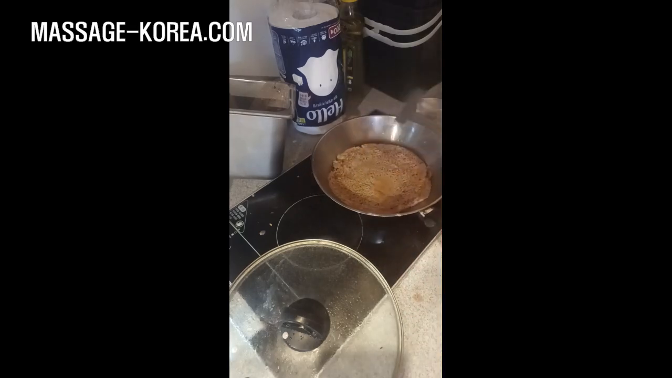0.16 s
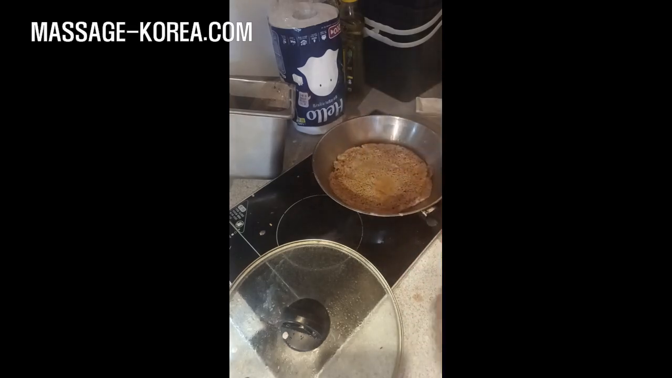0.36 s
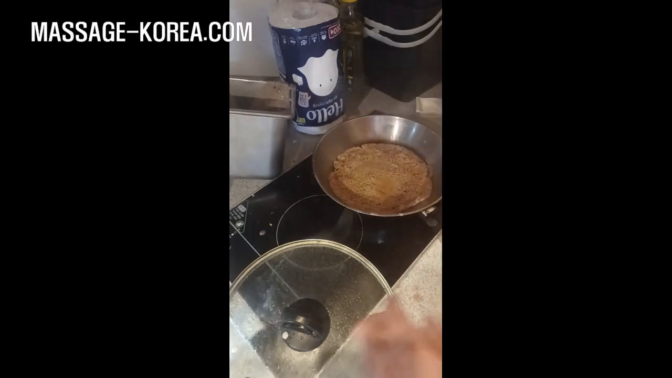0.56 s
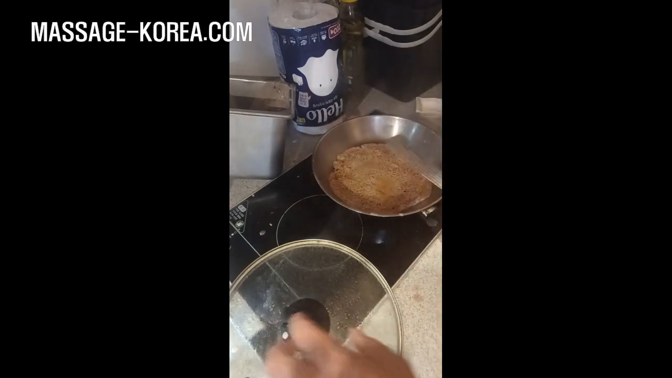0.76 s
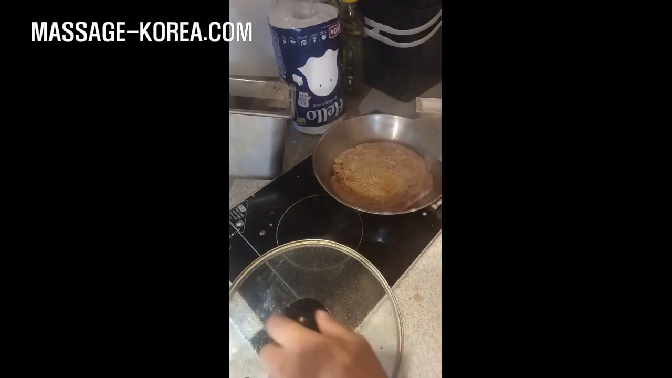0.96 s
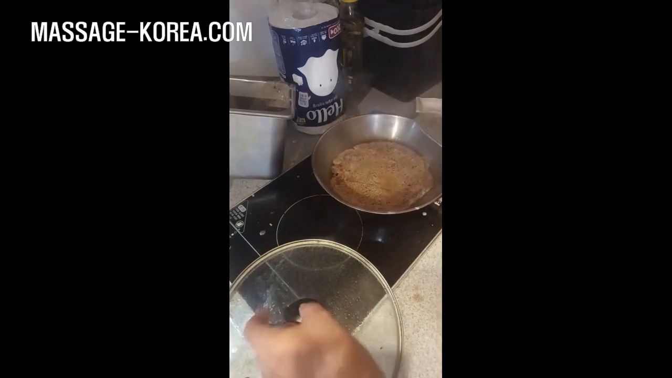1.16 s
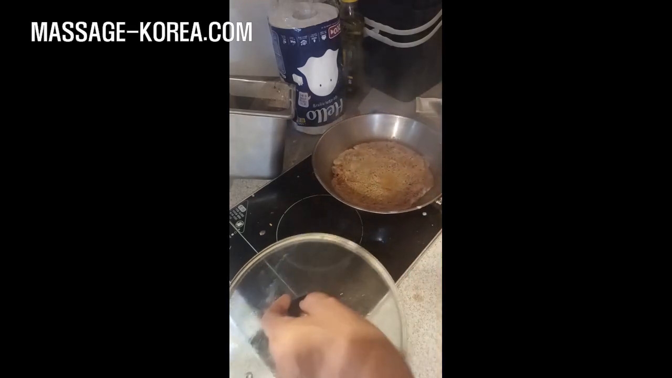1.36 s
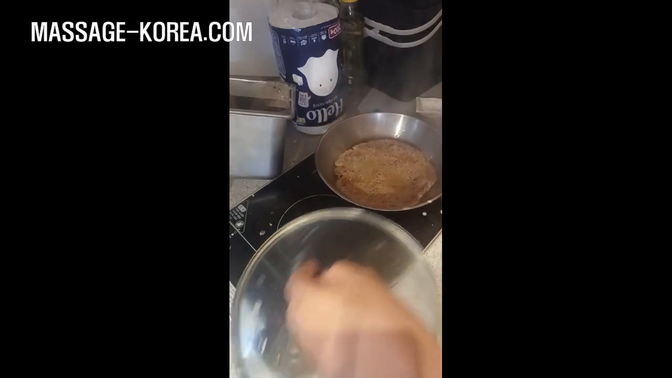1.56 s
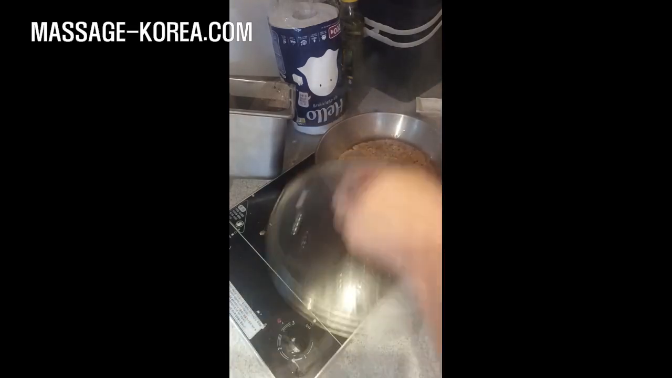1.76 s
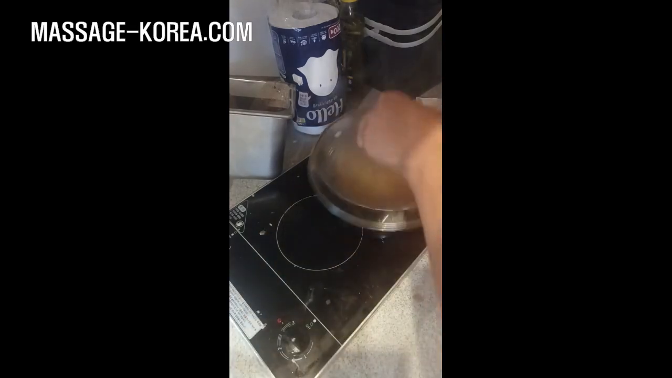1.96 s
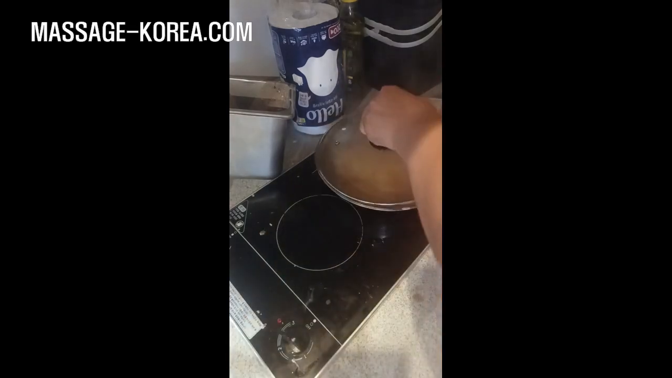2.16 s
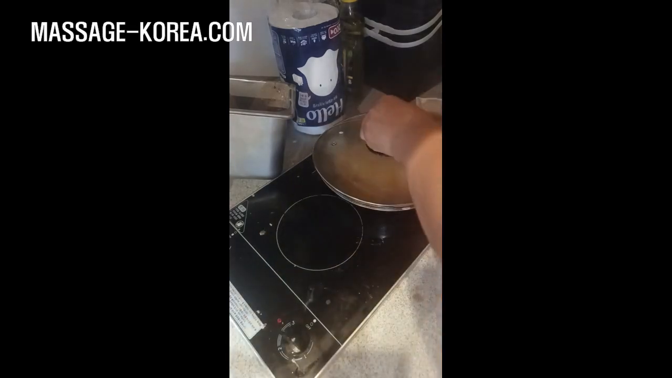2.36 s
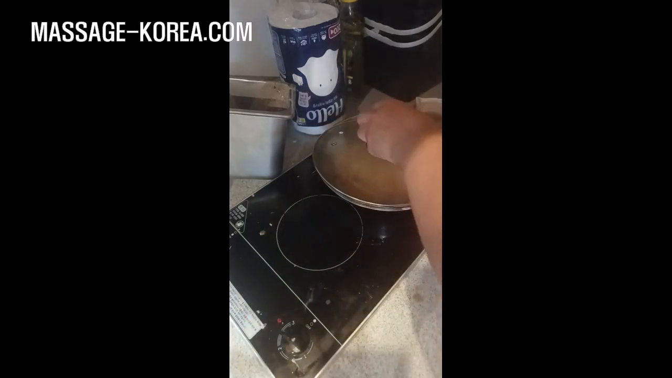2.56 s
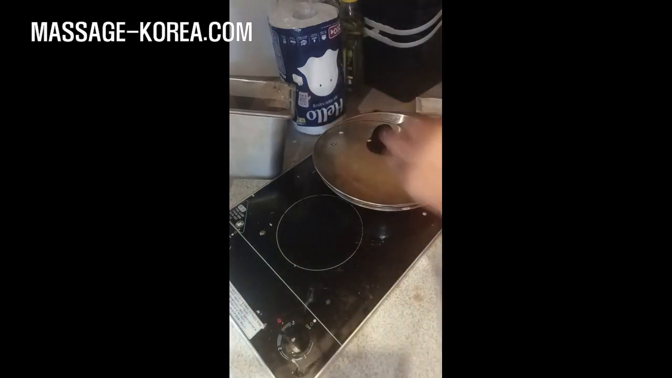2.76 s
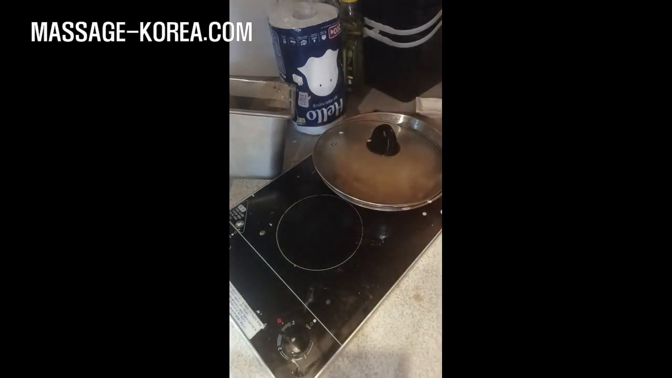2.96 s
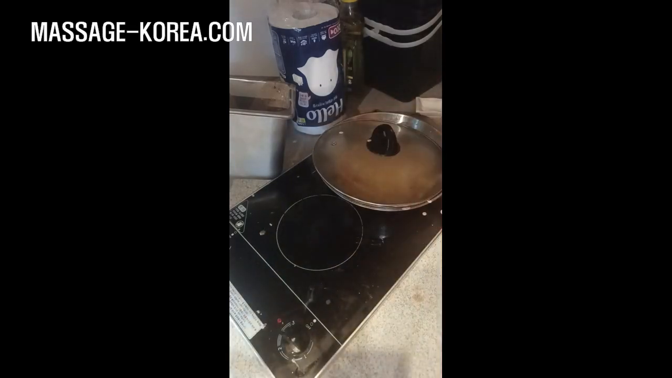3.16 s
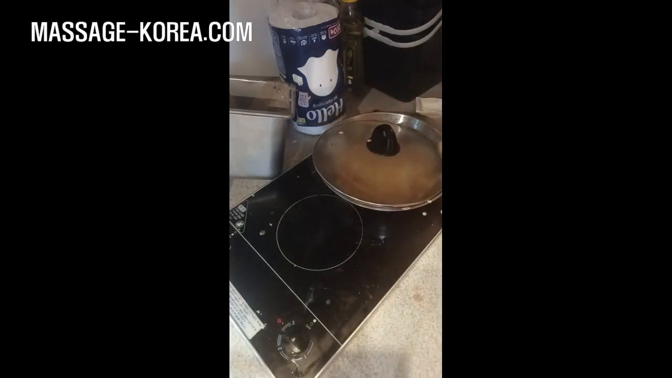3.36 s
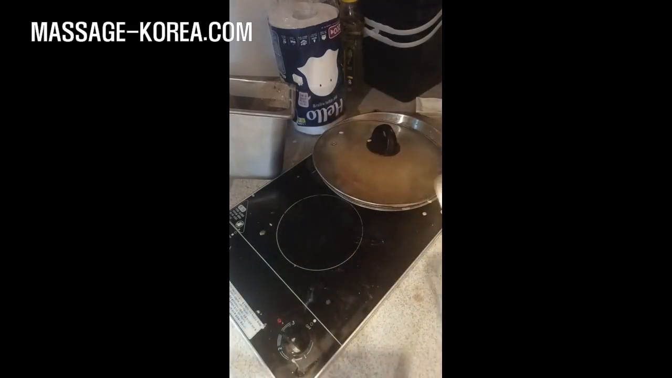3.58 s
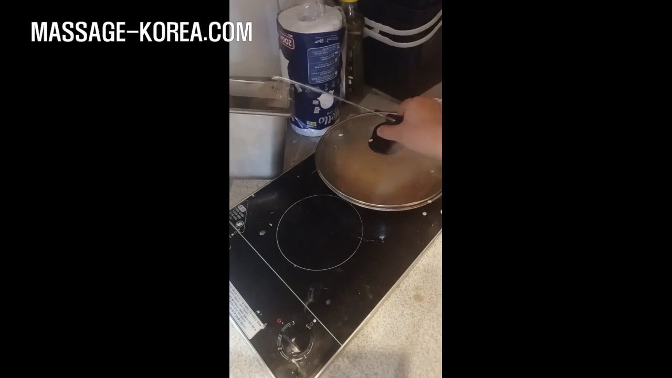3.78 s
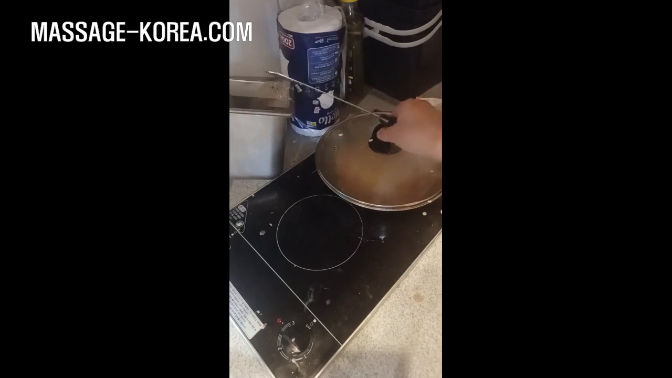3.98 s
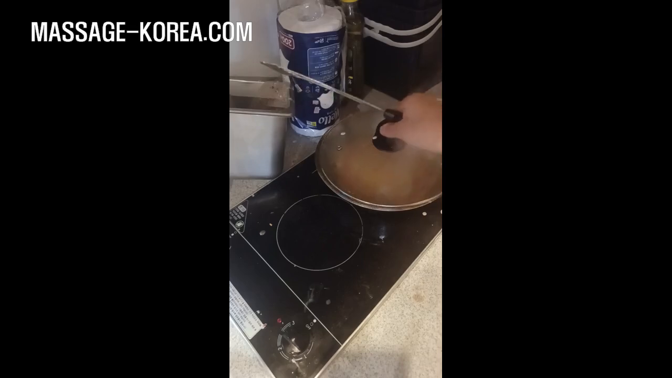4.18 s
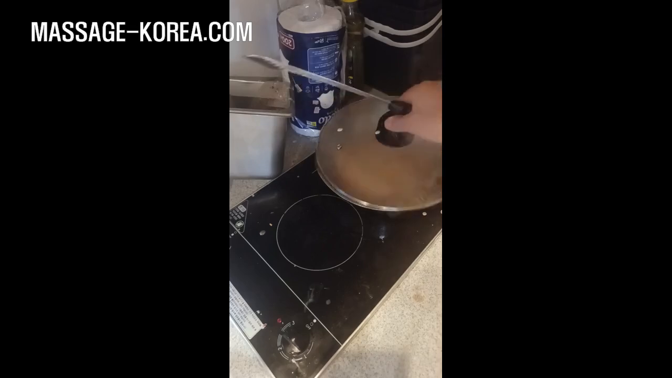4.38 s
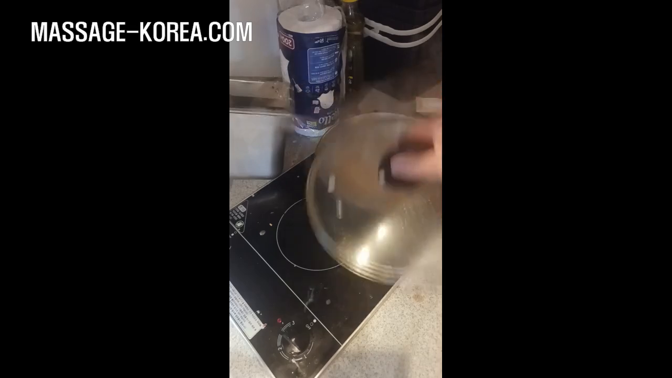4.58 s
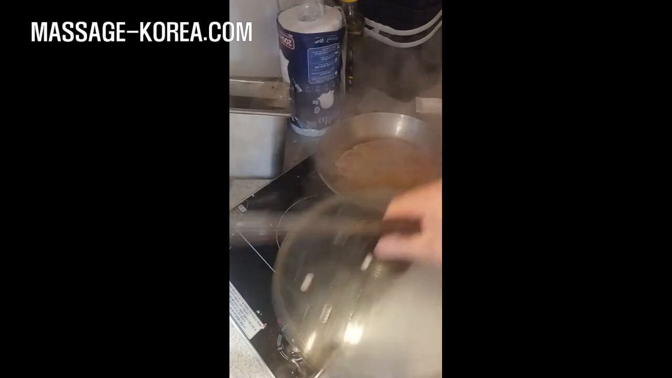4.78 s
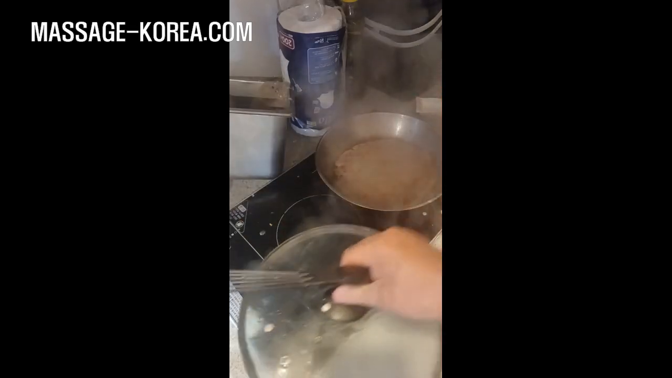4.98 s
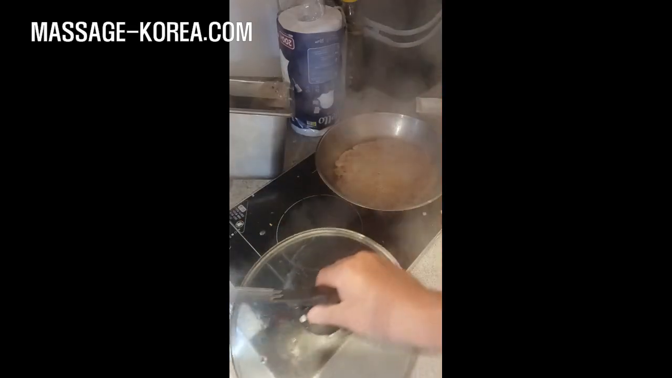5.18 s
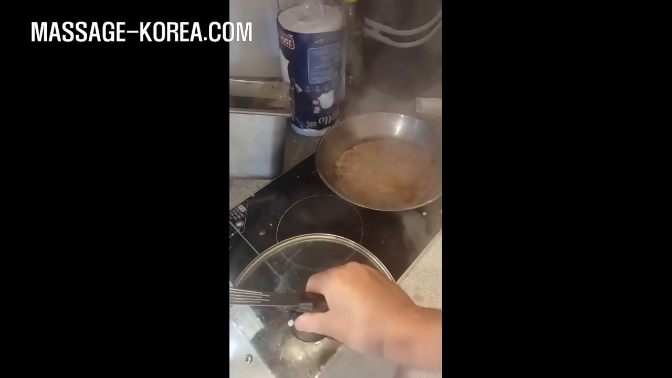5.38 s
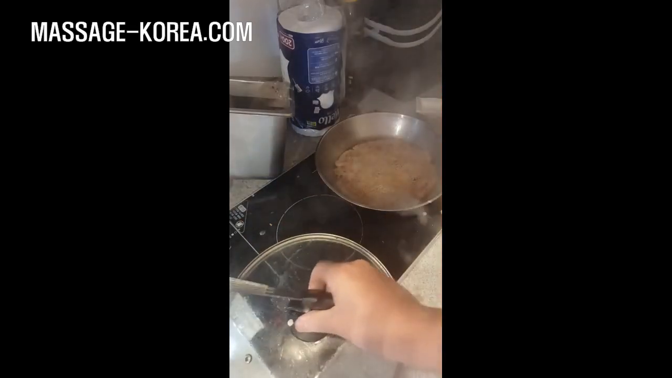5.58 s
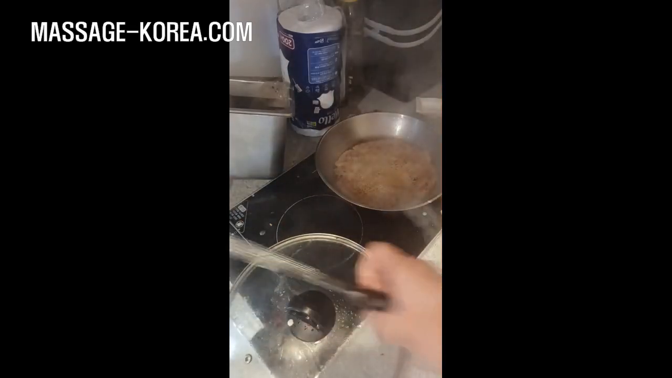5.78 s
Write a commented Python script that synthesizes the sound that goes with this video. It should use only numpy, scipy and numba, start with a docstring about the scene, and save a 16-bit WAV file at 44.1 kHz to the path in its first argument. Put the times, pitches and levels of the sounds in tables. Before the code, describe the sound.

Phone-close frying in a small hard kitchen over faint hob hum and fan rumble. Bubbles tick and oil spits; soft handling knocks precede a clattering low thump as the lid covers the pan. The sizzle turns muffled and resonant. An abrupt cut leads to rattling glass, violent steamy spitting as the lid lifts, then several hard knocks on the hob, bright steel clinks and a calmer sizzle.

```python
"""Pancake under a glass lid

A pancake sizzles in oil in a steel pan, close to a phone: bubble clicks, snaps and noisy spits of oil.
A glass lid (ringing modes) is picked up and thumped on, which muffles the frying and makes it hollow.
After a cut with a split second of silence, the pan is full of steam: the lid rattles and comes off a louder,
wetter sizzle. It is put down on the hob, where a steel utensil clinks on it, over hum and fan in a small kitchen."""
import sys
import numpy as np
from scipy import signal
from scipy.fft import rfft, irfft, next_fast_len
from scipy.io import wavfile
from numba import njit

SR = 44100
rng = np.random.default_rng(int(sys.argv[2]) if len(sys.argv) > 2 else 0)


def master(y):
    """Save y as 16-bit WAV."""
    cut = np.clip(np.atleast_2d(y).T, -1, 1)
    pcm = np.round(cut * 32767)  # scale
    wavfile.write(sys.argv[1], SR, pcm.astype(np.int16))


N = 257103
TIME = np.arange(N) / SR
SIZE = next_fast_len(N + 8192, real=True)  # padded length for filtering by spectrum
FREQ = np.arange(SIZE // 2 + 1) * SR / SIZE
TOP_HZ = 15600  # top of the phone's band


# how far the lid closes the pan: lowered, seated, tilted, lifted off (t/s, closed share/0-1)
LID_CLOSED = [(1.7, 0.02), (2.02, 0.44), (2.2, 0.57), (2.42, 0.99), (4.08, 0.94), (4.33, 0.53),
              (4.41, 0.07)]
# how hard the oil fries: settles, boils up with trapped steam, dries off (t/s, relative level/dB)
HEAT = [(0, -10.5), (.2, -15), (.4, -16.5), (.92, -15), (1.55, -16), (1.95, -18.5), (2.7, -22),
        (3.7, -22.5), (3.74, -11), (3.88, -10.5), (4.0, -14), (4.13, -6.5), (4.6, -8), (4.75, -8.5),
        (5.38, -8.5), (5.53, -15)]
MUFFLE_DB = -8.5  # what a closed lid takes off the sizzle at its source


def frying(bed_db, crackle_db, left_db, hollow_db, rattle_db, clack_db, clack_hz):
    """The sizzle leaves the open pan directly, or else by the rim gap and the ringing air under the lid."""
    closed = np.clip(curve(LID_CLOSED), 0, 1)
    strength = undb(curve(HEAT) + MUFFLE_DB * closed)
    bed = bubbles(per_s=2400, spread_db=5.5, flurry_per_s=190, flurry_db=3.7, flurry_t60=.034, fizz=.9)
    source = bed * strength * undb(bed_db)
    source += spits(gain_db=-2.5, body_db=-1.5, snap=0.54, body_hz=3150)
    snaps = undb(crackle_db) * strength * crackles(per_s=600, spread_db=4.2, t60=.0013, low_hz=2000)
    oil = ports(scatter(source, t60=0.081, direct=0.84) + snaps, split_hz=1420, lag_s=0.0001154)

    # the rim's taps are heard directly and through the air under the lid
    taps = rim_taps(rattle_db, clack_hz)
    clacks = undb(clack_db) * ports(np.array([taps, np.roll(taps, 40)]), split_hz=1500)
    under_lid = ports(scatter(source, t60=0.037, direct=1.3) + taps, split_hz=1800)
    hollow = undb(hollow_db) * cavity(under_lid, closed, gap_hz=233)
    both = pan_colour(oil, hollow, closed) + clacks
    return both * undb([[left_db / 2], [-left_db / 2]])


def bubbles(per_s, spread_db, flurry_per_s, flurry_db, flurry_t60, fizz):
    """Tiny steam bubbles burst as clicks at chance moments; fading flurries swell them over a steady fizz."""
    flurry_size = undb(flurry_db * np.minimum(rng.standard_normal(N), 2))
    starts = (rng.random(N) < flurry_per_s / SR) * flurry_size
    power = np.abs(signal.fftconvolve(starts ** 2, fade(TIME[:SR // 4], flurry_t60) ** 2)[:N])
    click_size = undb(spread_db * np.minimum(rng.standard_normal(N), 2))
    clicks = (rng.random(N) < per_s / SR) * rng.choice([-1, 1], N) * click_size
    return clicks / clicks.std() * np.sqrt((power / power.mean() + fizz) / (1 + fizz))


def crackles(per_s, spread_db, t60, low_hz):
    """Lone bubbles snap as tiny decaying tones, each at its own pitch and with its own phase at each port."""
    out, t = np.zeros((2, N)), TIME[:100]
    for when, pitch, size, *phases in rng.random((int(per_s * N / SR), 5)):
        hz = low_hz + pitch * (TOP_HZ - low_hz)
        db = spread_db * min(-np.log(1 - size), 4)
        ring = np.sin(2 * np.pi * (hz * t + np.array(phases)[:, None])) * fade(t, t60)
        add(out, when * N / SR, undb(db) * ring)
    return out / out.std()


# single spits of oil at set times, faint to loud (t/s, relative spray level/dB, t60/s, relative body level/dB)
SET_SPITS = [(.079, -3.5, .044, -11), (0.481, -10, .06, -12), (.5564, -8.5, 0.055, -6),
             (0.7551, -4, .045, -16), (0.9131, -9, 0.11, -5), (0.9856, -2, .07, -19),
             (1.1128, -2, 0.061, -15), (1.1606, -9, 0.059, -28), (1.3395, 0, 0.027, -20),
             (1.376, -4, .056, -3), (1.5197, -12, .065, -28), (1.721, -5.5, 0.044, -28),
             (1.953, -18, .06, -6.5), (2.0157, -13, 0.17, -10), (2.278, -10, 0.26, -9),
             (2.5352, -13.5, 0.078, -23), (2.842, -9.5, 0.035, -31), (2.8964, -13, .13, -31),
             (3.072, -14, 0.084, -19), (3.2434, -5.5, 0.028, -30), (3.475, -16.5, 0.096, -11.5),
             (3.7308, -7, 0.15, -7.5), (4.2284, 10.5, 0.023, 3), (4.4381, 3, .07, 1),
             (4.725, 10.5, 0.043, -2), (4.839, -11, .049, 11.5), (5.019, -6, 0.039, 6),
             (5.187, 9, 0.034, -14), (5.6037, 0.5, 0.037, -15), (5.77, 1.5, .049, 0)]


def spits(gain_db, body_db, snap, body_hz):
    """A drop of water explodes: a snap and a fading high spray, over a lower body with its own level."""
    out, t = np.zeros(N), TIME[:SR // 6]
    low = signal.butter(2, body_hz, fs=SR, output="sos")
    high = signal.butter(2, body_hz, "high", fs=SR, output="sos")
    for s, db, t60, low_db in SET_SPITS + small_spits():
        envelope = fade(t, t60) + snap * fade(t, 0.0043)
        spray, body = rng.standard_normal((2, len(t))) * envelope
        add(out, s, undb(db + gain_db) * signal.sosfilt(high, spray))
        add(out, s, undb(low_db + body_db) * signal.sosfilt(low, body))
    return out


# the many small spits come by chance; spray and body levels are relative to the heat
SMALL_SPITS_PER_S = 15
SMALL_SPIT_DB, SMALL_BODY_DB, SMALL_SPREAD_DB, SMALL_T60_S = 3, 1.5, 4.5, 0.064


def small_spits():
    """Chance rows like those of SET_SPITS, loosely spaced and as strong as the oil is hot."""
    rows = []
    for k, (late, size, body) in enumerate(rng.random((int(SMALL_SPITS_PER_S * N / SR), 3))):
        s = (k + late) / SMALL_SPITS_PER_S
        heat = np.interp(s, *np.transpose(HEAT))
        spray_db = heat + SMALL_SPIT_DB + SMALL_SPREAD_DB * (2 * size - 1)
        low_db = heat + SMALL_BODY_DB + 2 * SMALL_SPREAD_DB * (2 * body - 1)
        rows.append((s, spray_db, SMALL_T60_S, low_db))
    return rows


def scatter(x, t60, direct):
    """Each click comes from its own spot in the pan, so each gets a different short tail of reflections."""
    decay = fade(TIME[:SR // 6], t60) ** 2
    power = np.abs(signal.fftconvolve(x ** 2, decay / decay.sum())[:N])
    paths = np.array([x, x * rng.choice([-1, 1], N)])
    tail = np.sqrt(power) * rng.standard_normal((2, N))
    return (direct * paths + tail) / np.sqrt(1 + direct ** 2)


# the short silence at a cut to a later, steamy moment (start t/s, end t/s)
CUT_S = (3.7155, 3.7302)
# colour of the open pan, before and after steaming (f/Hz, relative level/dB)
OIL_COLOUR = [(150, -23), (300, -50.5), (550, -11.5), (830, 7), (1050, 1.5), (1500, 6), (2500, 5.5),
              (4200, 2.5), (5600, 1.5), (7100, 5), (8300, -0.5), (11000, 3), (15500, -0.5)]
WET_COLOUR = [(150, -34), (550, -37), (800, 1), (1100, -1), (1450, -0.5), (1850, 7.5), (2300, 2.5),
              (2700, 5), (4700, 3.5), (7100, 6.5), (8000, 2.5), (9000, 0), (11000, 1), (15500, 0.5)]
# what escapes round the rim of the lid, dry and as a jet of steam (f/Hz, relative level/dB)
RIM_DRY = [(200, -2), (600, 4.5), (1500, -18), (3200, -7.5), (4200, -1.5), (6600, 1.5), (8800, -8.5),
           (11000, -5.5), (15500, -7)]
RIM_STEAM = [(200, -1.5), (600, 2), (1500, -37), (4300, -6.5), (5400, -5.5), (7100, 0), (8000, -8),
             (9200, -4.5), (11500, 3.5), (15500, -3)]


def pan_colour(oil, hollow, closed):
    """The lid's position mixes open pan against rim leak plus hollow air; steam recolours both."""
    def pan(colour, rim):
        """Open and covered sound in equal-power shares."""
        covered = through(oil, treble_shape(rim)) + hollow
        return np.sqrt(1 - closed) * through(oil, treble_shape(colour)) + np.sqrt(closed) * covered

    return np.where(TIME < CUT_S[0], pan(OIL_COLOUR, RIM_DRY), pan(WET_COLOUR, RIM_STEAM))


# air resonances between pan and lid, without steam or gap (f/Hz, width/Hz, relative level/dB)
CAVITY_MODES = [(744, 44, -14), (1127, 46, 1), (1158, 41, 8.5), (1808, 49, 5), (2368, 40, 5),
                (2973, 40, 3.5), (3560, 67, 2.5), (4100, 52, -2), (4960, 69, 1.5)]
STEAM_RISE = 1.106  # pitch ratio: steam carries sound faster


def cavity(pair, closed, gap_hz, steam_db=3):
    """The air under the lid rings; steam and an opening gap raise its pitch, trapped steam drives it harder."""
    steaming = TIME > CUT_S[0]
    rise = np.where(steaming, STEAM_RISE, 1)
    opening = gap_hz * (1 - closed)
    rings = [sum(undb(db) * resonator(x, hz * rise + opening, float(width))
                 for hz, width, db in CAVITY_MODES) for x in pair]
    return np.array(rings) * undb(steam_db * steaming * (2 * closed - 1.5))


@njit
def resonator(x, hz, width):
    """State-variable band-pass with a moving centre."""
    y, b, l = np.empty(len(x)), 0., 0.  # b, l: band and low states
    for i in range(len(x)):
        g, k = np.tan(np.pi * hz[i] / SR), width / hz[i]
        v = (b + g * (x[i] - l)) / (1 + g * (g + k))
        b, l, y[i] = 2 * v - b, l + 2 * g * v, k * v
    return y


# the lid's rim clacking on the pan (t/s, relative level/dB)
RATTLES = [(3.733, -17), (3.804, -6.5), (3.849, -10), (3.864, -9), (4.219, -6.5), (4.268, -8),
           (4.303, -5.5), (4.326, 6.5), (4.438, 0)]


def rim_taps(rattle_db, clack_hz):
    """The glass rim taps the pan: short noise bursts, band-limited to dull clacks."""
    taps, t = np.zeros(N), TIME[:SR // 20]
    for s, db in RATTLES + chatter():
        add(taps, s, undb(db + rattle_db) * rng.standard_normal(len(t)) * fade(t, 0.011))
    return signal.sosfilt(signal.butter(2, [450, clack_hz + 700], "band", fs=SR, output="sos"), taps)


# the rim chatters as the lid is tilted off: span (s), taps a second, mean relative level (dB)
CHATTER_S, CHATTER_PER_S, CHATTER_DB = (4.17, 4.45), 45, -14.5


def chatter():
    """Chance rows like those of RATTLES: light, uneven taps of the sliding rim."""
    start, end = CHATTER_S
    chance = rng.random((int((end - start) * CHATTER_PER_S), 2))
    return [(start + (k + late) / CHATTER_PER_S, CHATTER_DB + 10 * (size - .5))
            for k, (late, size) in enumerate(chance)]


# blows (t/s, relative level/dB, contact corner f/Hz, crunch/s) and modes (f/Hz, t60/s, relative level/dB)
PAN_BLOWS = [(2.218, -1.5, 480, 0.0085), (2.299, 2.5, 5100, 0.016), (2.314, 4, 3000, 0.0095),
             (2.328, 6, 250, 0.019), (2.372, -0.5, 150, 0.011), (3.73, -19, 500, 0.0081),
             (3.806, -16.5, 496, 0.022), (3.87, -15, 450, 0.043), (3.99, -17, 384, 0.063),
             (4.092, -9.5, 690, 0.011), (4.118, -10, 500, 0.019), (4.16, -12, 396, 0.018)]
PAN_MODES = [(55.7, 0.37, -3), (87.4, 0.29, 4.5), (127, 0.2, -1), (167, 0.18, -5.5), (207, 0.49, -11.5),
             (275.7, 0.31, -6.5), (336, 0.29, -4), (506, 0.17, 2), (595, 0.2, -12), (680, .14, -8),
             (1039, 0.16, -3.5), (1317, 0.13, -7), (1820, 0.081, -13)]


def lid_on_pan():
    """The lid thumps onto the steel pan and knocks on it again later, ringing low modes."""
    return knocks(PAN_BLOWS, PAN_MODES, clatter_db=-2.5, clatter_t60=0.1, clatter_hz=667,
                  split_hz=1300, detune=0.021, crack_db=-3)


# blows (t/s, relative level/dB, contact corner f/Hz, crunch/s) and modes (f/Hz, t60/s, relative level/dB)
HOB_BLOWS = [(.811, -8, 450, 0.0073), (.84, -13, 246, 0.011), (1.234, -18.5, 700, 0.055),
             (4.64, -17.5, 1200, 0.0063), (5.246, 0, 740, 0.0033), (5.301, 1.5, 1890, 0.0028),
             (5.327, 3.5, 750, 0.0027), (5.349, -4, 700, 0.0036), (5.686, -23.5, 1008, 0.0047)]
HOB_MODES = [(67.4, 0.13, -5), (100, 0.21, -0.5), (158, 0.14, -3), (205, 0.18, -5.5), (253, 0.12, -16),
             (333, 0.088, -31), (452, 0.23, -4.5), (639, 0.16, 0.5), (717, 0.12, 1), (867, 0.077, 4),
             (1386, 0.066, 4.5), (1700, 0.14, -4), (2140, 0.086, 12.5)]


def lid_on_hob():
    """The lid knocks on the hob, with mostly shorter modes."""
    return knocks(HOB_BLOWS, HOB_MODES, clatter_db=2.5, clatter_t60=0.07, clatter_hz=1120,
                  split_hz=970, detune=0.011, crack_db=2)


# blows (t/s, relative level/dB, contact corner f/Hz, crunch/s) and modes (f/Hz, t60/s, relative level/dB)
CLINKS = [(.756, -18.5, 6940, 0.0024), (5.162, -13.5, 5000, 0.0019), (5.377, -7.5, 7100, 0.0029),
          (5.39, -17.5, 6000, 0.034), (5.545, -19.5, 4000, 0.0054), (5.655, -22, 4000, .003),
          (5.69, -19, 3980, 0.0034)]
STEEL_MODES = [(1447, 0.098, 2), (1874, 0.087, 12), (1980, 0.2, -3), (1970, 0.21, 2), (2250, 0.085, 5),
               (2770, .35, -5), (2880, 0.28, 5), (3680, 0.19, -4), (4500, 0.29, -22), (4550, 0.22, -9)]


def utensil_on_lid():
    """Hard steel contact keeps the treble and rings high, nearly fixed modes."""
    return knocks(CLINKS, STEEL_MODES, clatter_db=6, clatter_t60=0.044, clatter_hz=4900,
                  split_hz=740, detune=0.004, crack_db=-4)


def knocks(blows, modes, clatter_db, clatter_t60, clatter_hz, split_hz, detune, crack_db):
    """Each blow cracks and rings modes, shifted by how the lid sits, over dense clatter; soft contact is dull."""
    out, t = np.zeros((2, N)), TIME[:SR // 3]
    dull = signal.butter(1, min(clatter_hz, SR / 3), fs=SR, output="sos")
    for s, db, corner_hz, crunch_s in blows:
        phases = rng.uniform(0, 2 * np.pi, (len(modes), 2, 1))
        shifts = 1 + detune * rng.uniform(-0.83, 1, len(modes))
        ring = sum(undb(mode_db) * fade(t, t60) * np.sin(2 * np.pi * hz * shift * t + phase)
                   for (hz, t60, mode_db), shift, phase in zip(modes, shifts, phases))
        clatter = signal.sosfilt(dull, rng.standard_normal((2, len(t))))
        # the clatter holds for the crunch, then fades
        clatter *= undb(clatter_db) * fade(np.maximum(t - crunch_s, 0), clatter_t60) / clatter.std()
        crack = undb(crack_db) * rng.standard_normal((2, len(t))) * fade(t, 0.076)
        contact = signal.butter(2, min(corner_hz, SR / 3), fs=SR, output="sos")
        add(out, s, undb(db) * signal.sosfilt(contact, ring / 2 + clatter + crack))
    return ports(out, split_hz)


# hum of the running hob, before its waver (f/Hz, rms level/dB)
HUM = [(62.3, -30.5), (119, -40), (343, -55)]
# colour of its cooling fan (f/Hz, relative level/dB)
FAN = [(25, -5.5), (45, -8), (62, 1.5), (80, -3.5), (115, -6.5), (180, -7), (340, -6), (480, -13.5),
       (700, -27), (1100, -6.5), (2000, -21.5), (8000, -51)]


def hob(fan_db, waver_db):
    """The hob hums as sines, wavering a little, and its cooling fan rumbles as shaped noise."""
    fan = through(ports(rng.standard_normal((2, N)), split_hz=760), shape(FAN))
    knots = np.linspace(0, N / SR, 60)
    hum = 0
    for hz, db in HUM:
        waver = waver_db * np.interp(TIME, knots, rng.standard_normal(len(knots)))
        hum = hum + np.sqrt(2) * undb(db + waver) * np.sin(2 * np.pi * hz * TIME)
    return hum + undb(fan_db) * fan / fan.std()


def kitchen(x, t60):
    """The short reverberation of a tiled corner, as a decaying noise tail."""
    tail = rng.standard_normal((2, SR // 2)) * fade(TIME[:SR // 2], t60)
    return signal.fftconvolve(x, tail / np.linalg.norm(tail[0]), axes=1)[:, :N]


def ports(pair, split_hz, lag_s=.00005):
    """Two microphone ports hear the bass nearly alike and the treble unrelated; the right a little later."""
    apart = FREQ ** 2 / (FREQ ** 2 + split_hz ** 2)
    side_power = .45 * apart + .06
    mid = through(pair[0], np.sqrt(1 - side_power))
    side = through(pair[1], np.sqrt(side_power))
    return np.array([mid + side, through(mid - side, np.exp(-2j * np.pi * FREQ * lag_s))])


def undb(db):
    """Decibels to gain."""
    return 10 ** (np.asarray(db) / 20)


def curve(rows):
    """Straight lines through (s, value) rows."""
    return np.interp(TIME, *np.transpose(rows))


def shape(points):
    """Gain at every frequency from (Hz, dB) points."""
    hz, db = np.transpose(points)
    return undb(np.interp(np.log(FREQ + 1), np.log(hz), db))


def treble_shape(points):
    """The same, with unit mean power in the treble."""
    gain = shape(points)
    return gain / np.sqrt(np.mean(gain[(FREQ > 4000) & (FREQ < 15500)] ** 2))


def through(x, response):
    """Filter by a frequency response."""
    return irfft(rfft(x, SIZE) * response)[..., :N]


def add(out, s, sound):
    """Mix a sound in from time s."""
    start = max(int(s * SR), 0)
    out[..., start:start + sound.shape[-1]] += sound[..., :N - start]


def fade(t, t60):
    """Exponential decay, 60 dB in t60."""
    return np.exp(-np.log(1000) * t / t60)


def scene():
    """Frying, lid and utensil in a small kitchen, over the running hob."""
    near = frying(bed_db=2.0, crackle_db=-6.5, left_db=2.0, hollow_db=3.5,
                  rattle_db=16.5, clack_db=-5.5, clack_hz=1530)
    near += lid_on_pan() + lid_on_hob() + utensil_on_lid()
    room = undb(-12) * kitchen(near, t60=.2)
    return near + room + hob(fan_db=-28.5, waver_db=1.0)


def record(dry):
    """The phone drops the deep bass, rounds off loud peaks and cuts the top; a cut leaves an instant of silence."""
    dry = signal.sosfilt(signal.butter(3, 42, "high", fs=SR, output="sos"), dry)
    clipped = dry / (1 + dry ** 6) ** (1 / 6)
    running = (TIME < CUT_S[0]) | (TIME > CUT_S[1])
    return signal.sosfilt(signal.ellip(10, .2, 70, TOP_HZ, fs=SR, output="sos"), clipped * running)


dry = scene()
out = record(dry)
master(out)
```